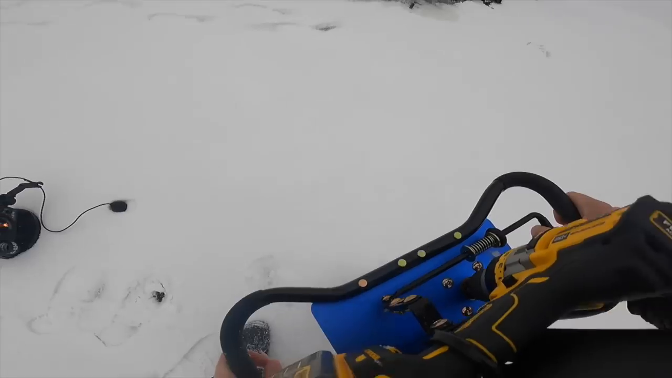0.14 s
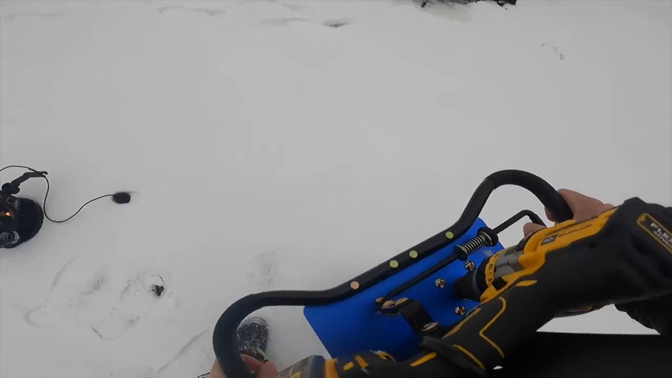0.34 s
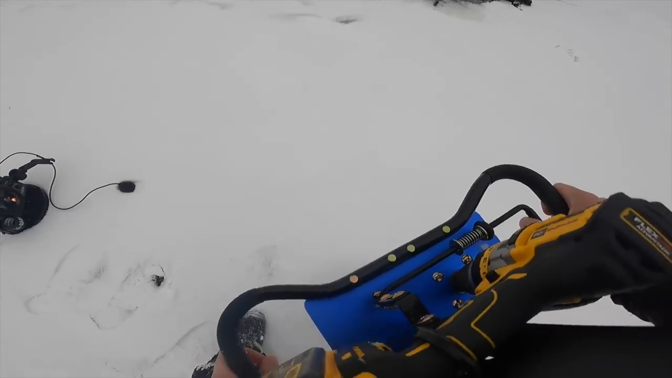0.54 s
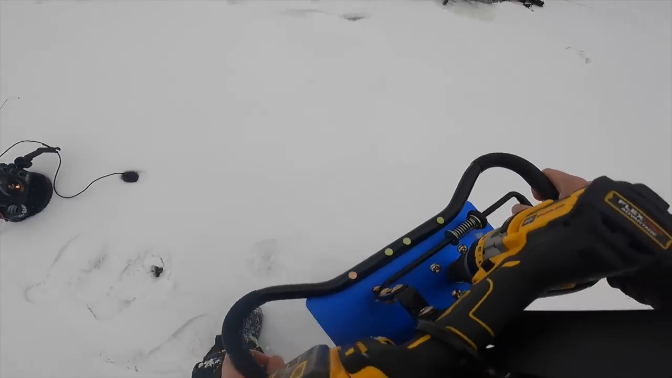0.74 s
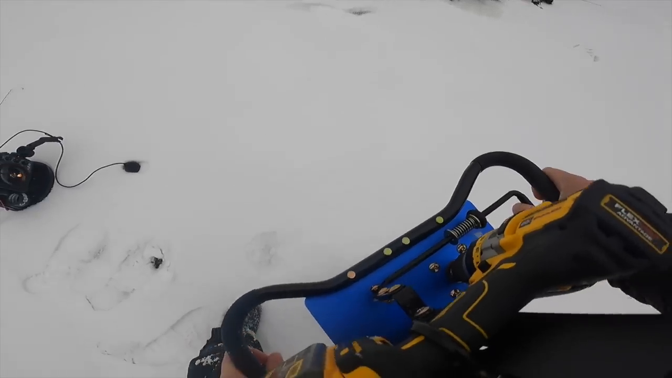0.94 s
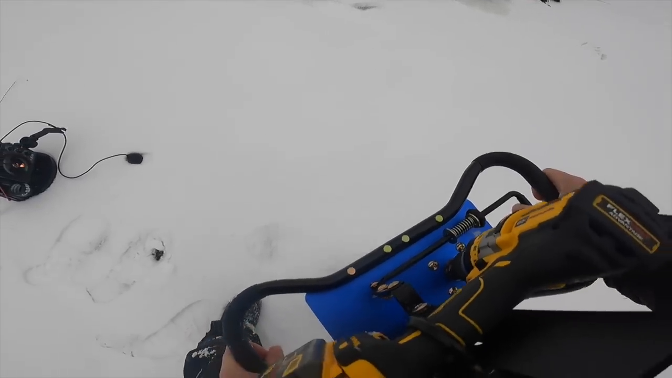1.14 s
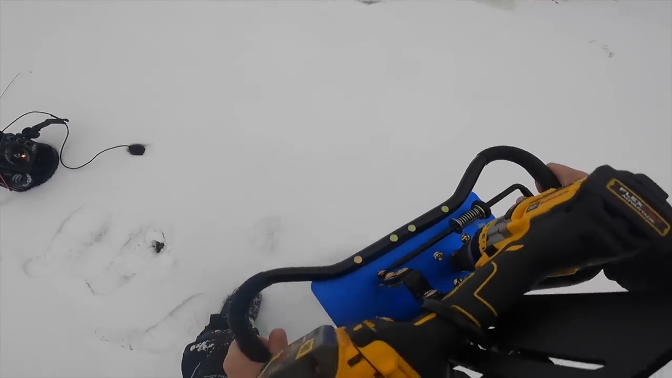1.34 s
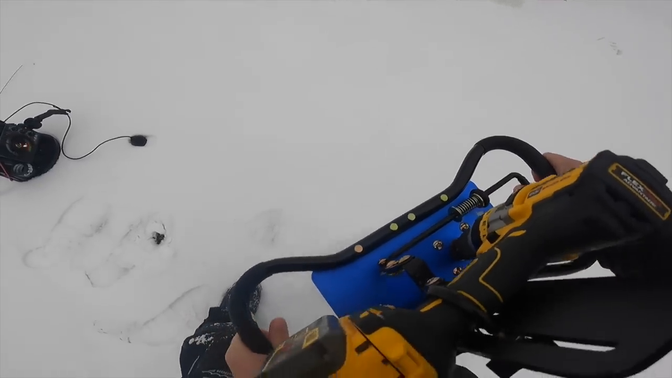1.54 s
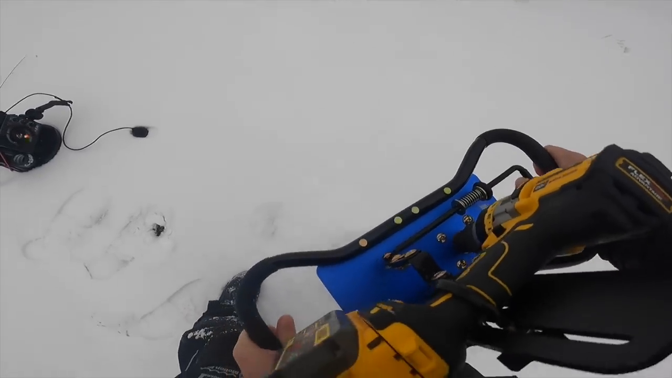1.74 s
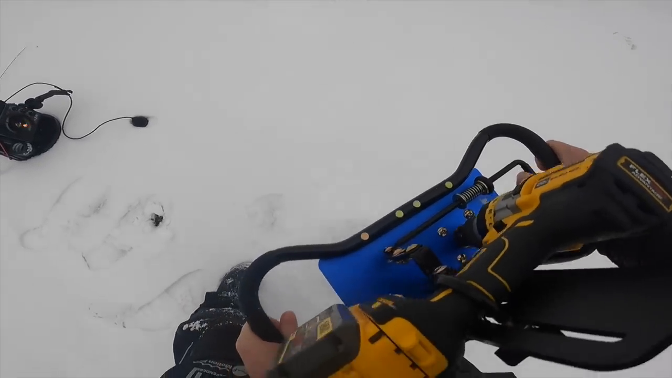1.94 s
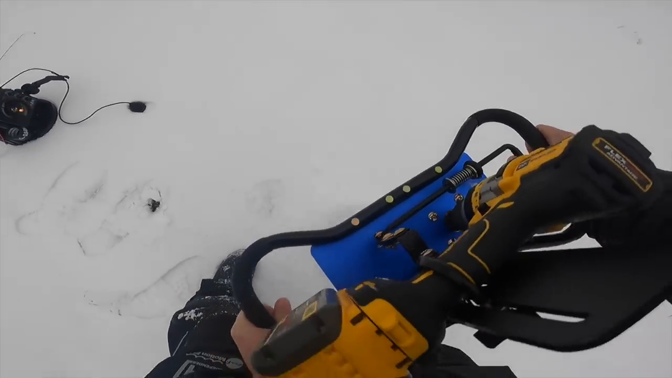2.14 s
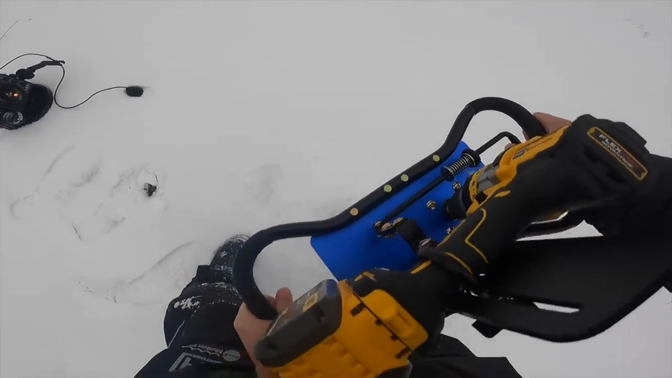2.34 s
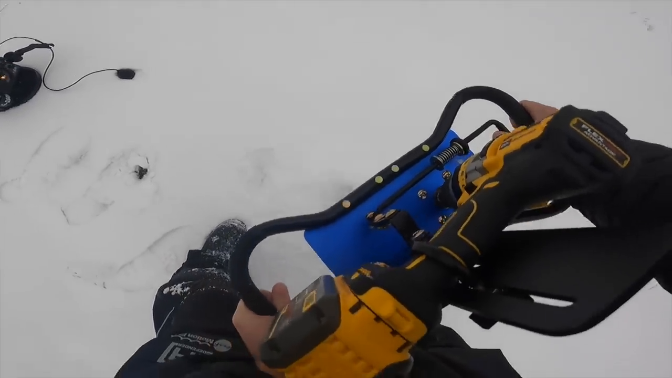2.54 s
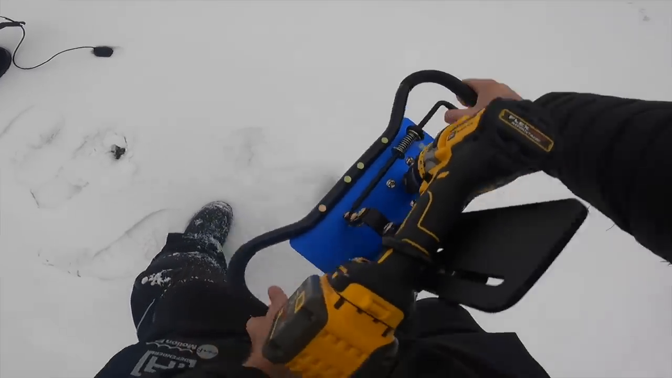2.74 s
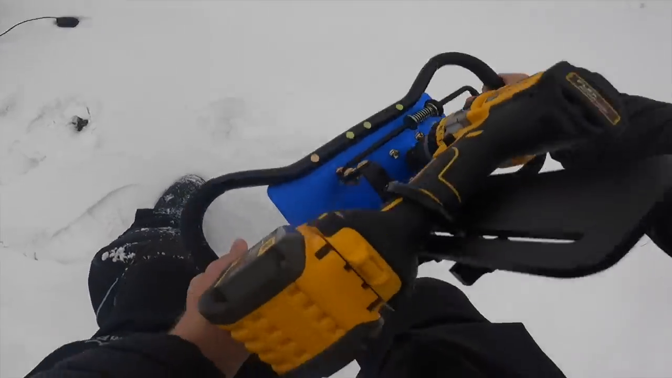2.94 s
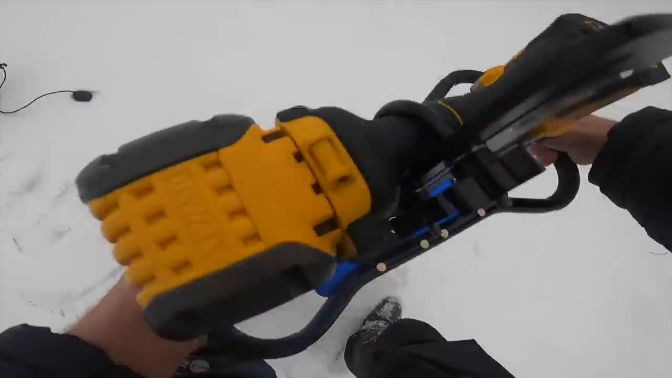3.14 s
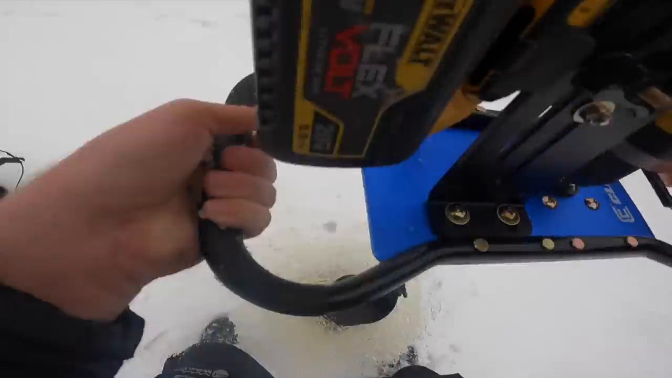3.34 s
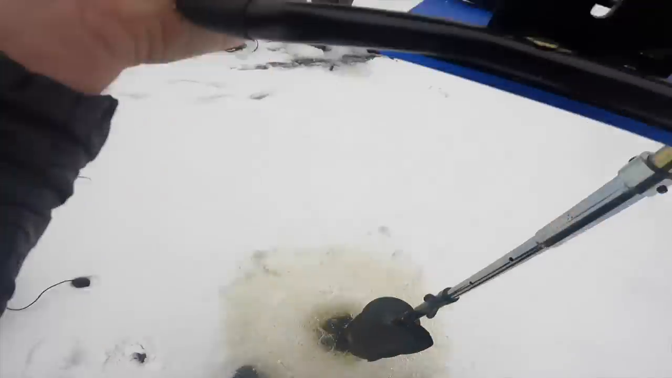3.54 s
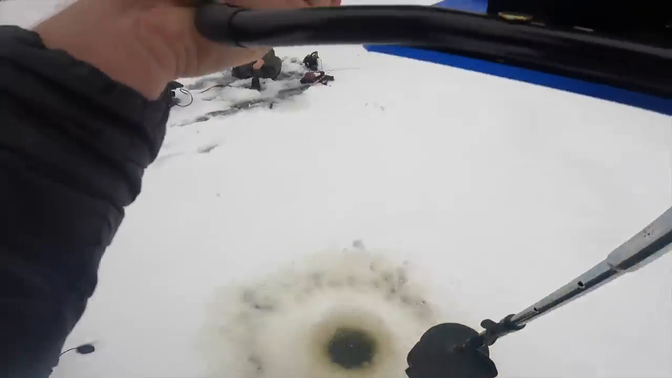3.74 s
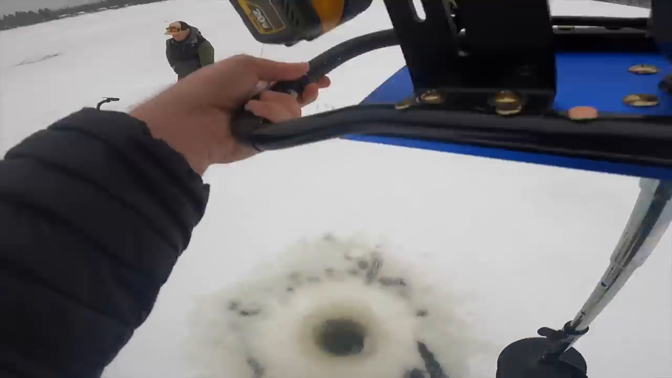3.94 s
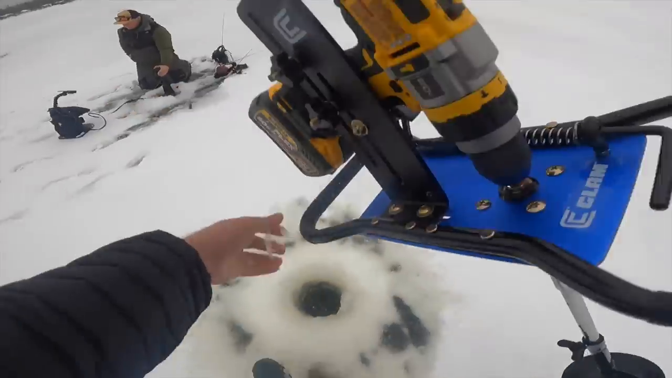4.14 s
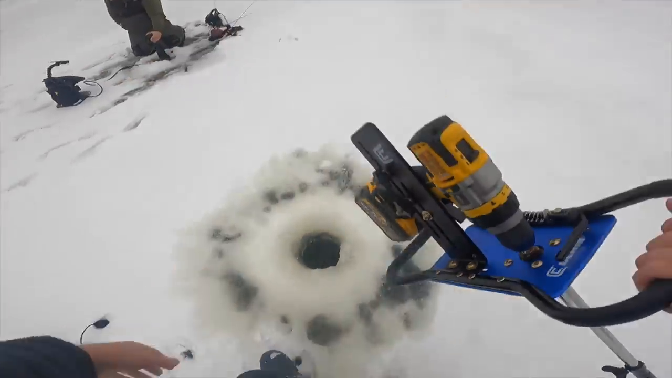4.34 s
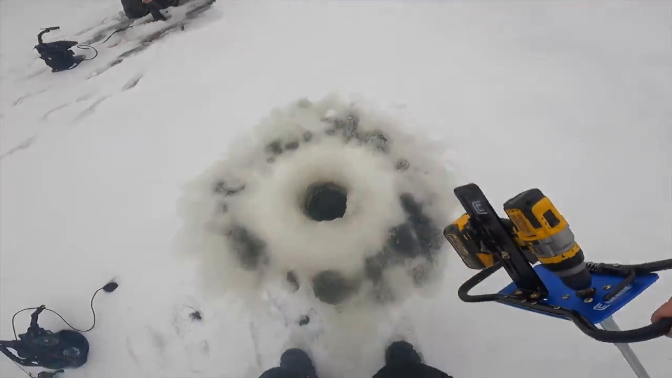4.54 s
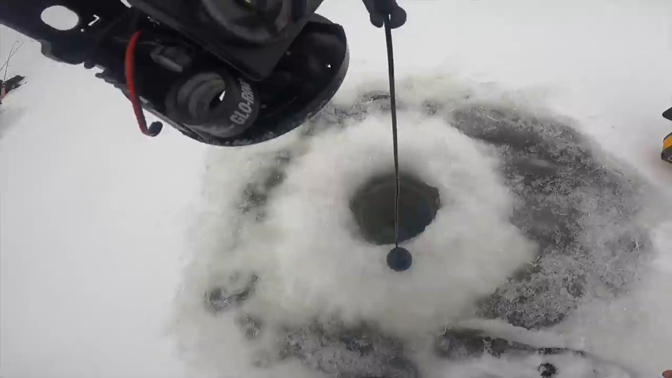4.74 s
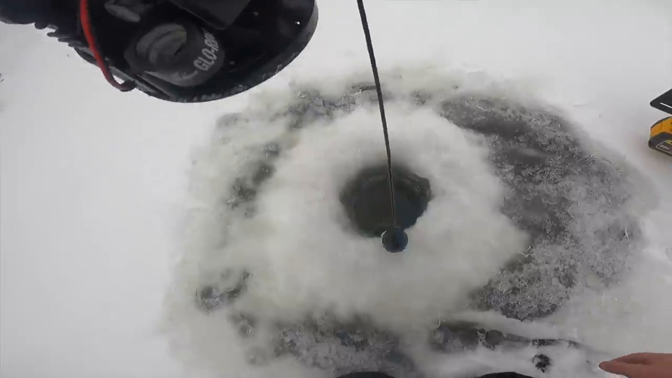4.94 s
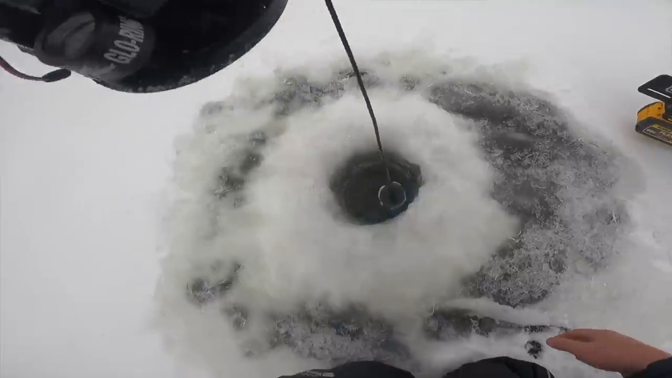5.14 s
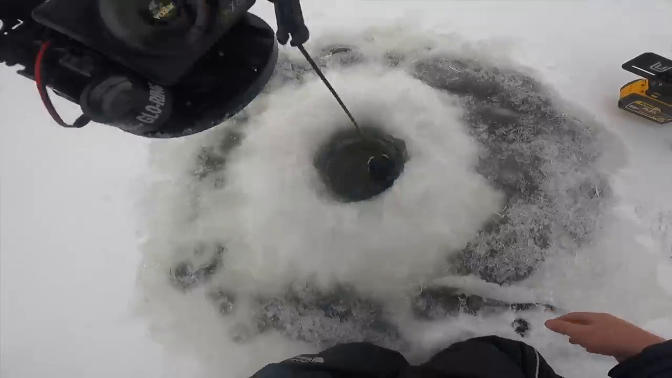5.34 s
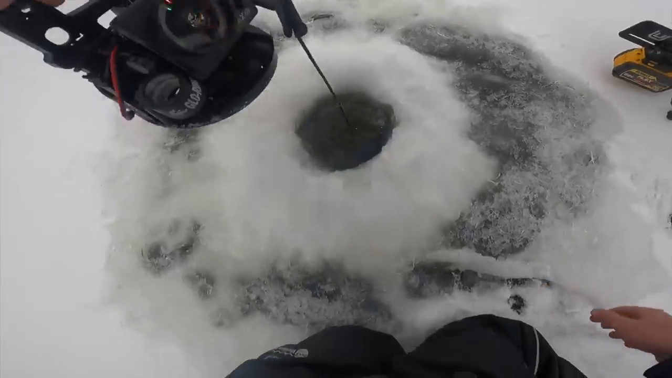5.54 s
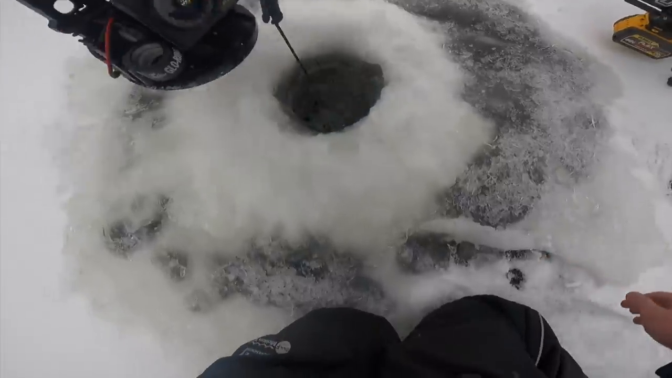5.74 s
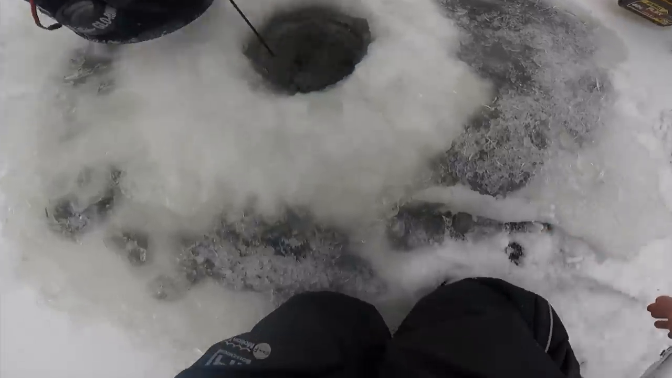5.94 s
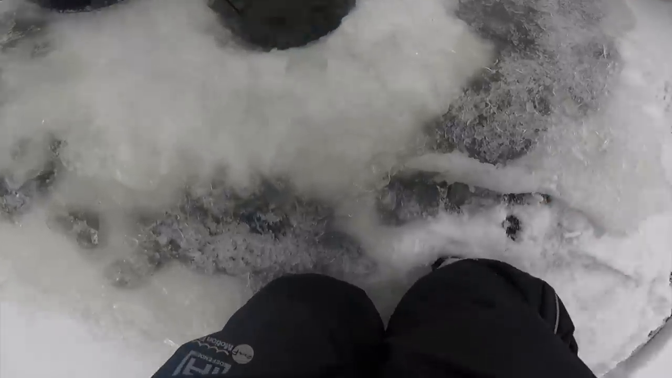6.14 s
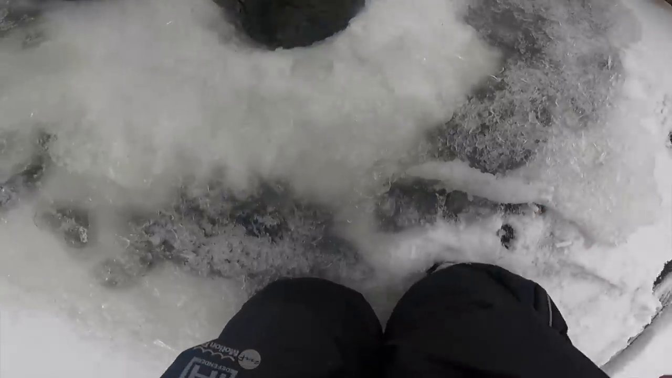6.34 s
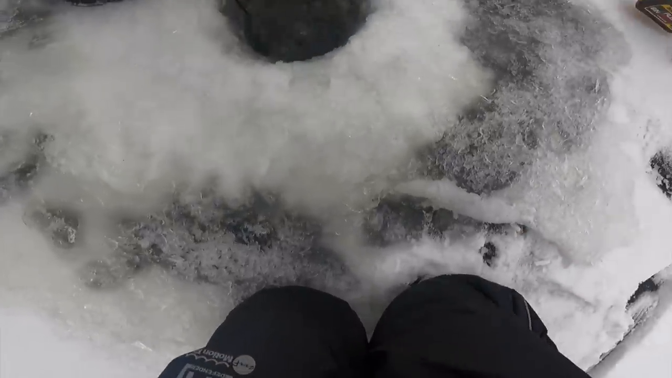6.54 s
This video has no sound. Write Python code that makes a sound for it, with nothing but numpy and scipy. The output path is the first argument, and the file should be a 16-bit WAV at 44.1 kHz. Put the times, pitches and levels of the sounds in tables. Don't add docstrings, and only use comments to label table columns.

```python
import sys
import numpy as np
from scipy import signal
from scipy.fft import rfft, irfft, next_fast_len
from scipy.io import wavfile
from scipy.ndimage import uniform_filter1d, map_coordinates

SR = 44100
rng = np.random.default_rng(int(sys.argv[2]) if len(sys.argv) > 2 else 0)


def boost(x):
    u = np.asarray(x, float) / 20
    return 10 ** u


def store_wav(level_fs):
    pcm = np.round(np.clip(np.atleast_2d(level_fs), -1, 1) * 32767)
    wavfile.write(sys.argv[1], SR, pcm.T.astype(np.int16))


N = 295029
LEFT_RIGHT = np.array([[.5], [-.5]])


def unit(x):
    return x / np.sqrt(np.mean(x ** 2) + 1e-20)


def along(points, hz):
    f, v = np.transpose(points)
    return np.interp(np.log(hz + 1), np.log(f + 1), v)


def curves(rows):
    s, *cols = np.transpose(rows)
    return [np.interp(np.arange(N) / SR, s, c) for c in cols]


def gate(start, end, fade):
    t = np.arange(N) / SR
    return np.clip((t - start) / fade, 0, 1) * np.clip((end - t) / fade, 0, 1)


def wobble(rate):
    knots = rng.standard_normal(int(N * rate / SR) + 4)
    return map_coordinates(knots, [np.arange(N) * rate / SR])


def filtered(x, response):
    m = next_fast_len(N + 8192)
    return irfft(rfft(x, m) * response(np.fft.rfftfreq(m, 1 / SR)), m)[..., :N]


def shape(spectrum):
    return lambda hz: boost(along(spectrum, hz))


def resonances(modes):
    def response(f):
        return sum((-1) ** k * boost(db) * 1j * f * width / (hz * hz - f * f + 1j * f * width)
                   for k, (hz, width, db) in enumerate(modes))
    return response


def grit(rate, spread_db):
    hit, sign, size = rng.random((3, N))
    return unit((hit < rate / SR) * np.sign(sign - .5) * boost(-spread_db * np.log(size + .06)))


def rush(colour, alike, patchy_db, chips=0):
    z = signal.stft(rng.standard_normal((2, N)), nperseg=512)[2]
    field = uniform_filter1d(rng.standard_normal(z.shape[1:]), size=6, axis=0)
    field = uniform_filter1d(field, size=10, axis=1)
    pair = unit(signal.istft(z * boost(patchy_db * unit(field)), nperseg=512)[1][:, :N]) + chips

    def mid_side(hz):
        turn = np.arccos(np.clip(along(alike, hz), -1, 1)) / 2
        return colour(hz) * [np.cos(turn), np.sin(turn)]
    mid, side = filtered(pair, mid_side)
    return unit(np.array([mid + side, mid - side]))


def whine(hz, drift):
    flutter = 1 + drift * wobble(110)
    return np.sqrt(2) * boost(3.5 * wobble(70) - 1) * np.sin(2 * np.pi * np.cumsum(hz * flutter) / SR)


def chirps(table):
    out, t = np.zeros(N + SR), np.arange(SR // 2) / SR
    for s, hz, rise, db, t60 in table:
        phase = 2 * np.pi * hz * (t + rise * t * t / t60)
        fade = boost(-15 * t / t60 - 220 * (t / t60) ** 2) * (1 - np.exp(-t * 90 / t60))
        out[round(s * SR):][:len(t)] += boost(db) * fade * np.sin(phase)
    return out[:N]


# time in seconds, share of extra speed.
EASES = [(.02, .035), (.13, .025), (.22, .015), (.285, .04), (.48, 0.039), (.57, .015), (.66, .045),
         (.73, .05), (.785, .03), (.85, .02), (.98, .05), (1.12, .05), (1.23, .025), (1.36, .05),
         (1.53, 0.052), (1.72, .02), (1.89, 0.046), (2.0, .015), (2.2, .035), (2.381, 0.026), (2.52, .065)]


def racing():
    t = np.arange(N) / SR
    climb_s, bite_s = .04, .022
    return sum(share * np.exp(-((t - s) / np.where(t < s, climb_s, bite_s)) ** 2) for s, share in EASES)


# time in seconds, mesh tone in Hz, effort in dB.
GEARS = [(0, 2395, 0), (.38, 2335, 0), (1.7, 2300, -1.5), (2.5, 2300, -1.5), (2.65, 2104, 4),
         (2.8, 2195, -1), (2.85, 2755, -2), (2.93, 3030, 0), (3.09, 3124, 0), (3.2, 3160, -2),
         (3.23, 3000, -21), (3.46, 1680, -8)]
# multiple of mesh, level in dB re mesh.
ORDERS_WEAK = [(1.22, -10), (3, -0.5), (4, -7), (5, -17)]


def gears(snag, ice):
    mesh_hz, effort_db = curves(GEARS)
    mesh_hz = mesh_hz * (1 + .007 * wobble(40) + racing())
    strain = 1 + 2 * snag + gate(THROUGH_S, 9, .1)
    drift = .011 * (1 + 2 * snag)
    mesh = whine(mesh_hz, drift)
    for multiple, db in ORDERS_WEAK:
        mesh = mesh + boost(db) / strain ** 2 * whine(multiple * mesh_hz, .015 * strain)
    mesh *= boost(-31.5 + 1.44 * effort_db - 4 * (1 - ice)) / (1 + 2 * snag)
    second = boost(-29.5 + effort_db) / strain ** .6 * whine(2 * mesh_hz, .012 * strain ** 1.2)
    carrier_db = -33 + 1.3 * effort_db - 5.5 * snag + 2.5 * (1 - ice)
    return mesh + second + boost(carrier_db) * whine(.615 * mesh_hz, drift)


SNAG_S, THROUGH_S = 2.45, 2.85
WET_DB = -17.5
# time in seconds, hiss in dB.
CUT = [(0, -20.5), (2.77, -21), (2.81, -21), (2.83, -27), (2.85, -20), (3.07, -20.5), (3.3, -26),
       (3.45, -29)]
# Hz, dB per Hz.
BLADES = [(710, -25), (1200, -4.5), (1460, -4.5), (2050, -12.5), (2380, -4.5), (2650, -9.5), (3350, -10.5),
          (4620, -2.5), (5310, -6), (7250, -2.5), (10600, -16), (12300, -20), (13000, -27), (14500, -30),
          (15500, -70)]
# Hz, width in Hz, dB.
SHAFT = [(609, 147, -3.5), (760, 207, -4), (1000, 142, 1), (1175, 119, -1.5), (1760, 240, -9.5),
         (3934, 150, -10.5), (6230, 240, -11)]
# Hz, dB per Hz.
ICE = [(15, -46), (25, -19), (70, 0), (113, 1.5), (230, -1.5), (425, -13), (500, -11.5), (650, -13.5),
       (1100, -120)]
# start in seconds, Hz, pitch rise, level in dB, t60 in seconds.
SLIPS = [(2.672, 3500, 0.6, -18, 0.12), (2.715, 4280, .05, -30, .07), (2.74, 4280, 0.2, -17, 0.087),
         (2.795, 4200, 0.3, -17, 0.082), (2.51, 5000, -.1, -24, .08), (2.57, 4450, .05, -25, .12),
         (2.85, 4400, -.05, -23, .07), (2.875, 4150, .1, -24, .08), (2.92, 4350, .05, -24, .06),
         (2.965, 3700, .05, -25, .05), (2.98, 4200, .05, -26, .06), (3.408, 3950, -0.1, -33, 0.09),
         (3.436, 3700, -0.25, -27, .07), (3.452, 4500, .1, -25, .04)]
# Hz, likeness.
ALIKE = [(60, 1), (700, .98), (1300, 1), (2400, 0.5), (3100, 0.99), (4400, 0.94), (7000, 0.99), (10500, 1),
         (11800, 0.18), (15000, 0.99)]
# Hz, L-R in dB.
LEAN = [(60, 0), (110, -1.5), (200, -1), (380, -2.5), (700, -4), (1290, -1.5), (2380, -5.5), (4400, -3.5),
        (8120, -1.0), (15000, 3.5)]
# Hz, L-R in radians.
LEAD = [(0, 0.09), (1810, 0.033), (2410, -0.93), (3100, -1.2), (3360, -0.84), (3880, 0.035),
        (10900, -0.014), (11700, 0.93), (12500, 0)]


def drill(surge):
    snag, ice = gate(SNAG_S, THROUGH_S + .103, .103), gate(-1, THROUGH_S, .036)
    wet = uniform_filter1d(np.clip(surge / boost(WET_DB), 0, 1), size=300)
    hiss_db = curves(CUT)[0]
    bite = wobble(14)

    hiss = rush(shape(BLADES), ALIKE, patchy_db=1.0, chips=.24 * grit(900, spread_db=6.5))
    hiss *= boost(hiss_db - .73 + .19 * bite + .87 * wobble(200))
    treble = filtered(hiss, lambda f: 1 / (1 + (9500 / (f + 1)) ** 8))
    hiss -= .6 * gate(3.2, 9, .04) * treble

    shaft_gain = ice * boost(-4 + snag) + wet * boost(-7.5) + (1 - ice) * boost(-22)
    shaft = rush(resonances(SHAFT), ALIKE, patchy_db=1.0, chips=.52 * grit(150, spread_db=4.5))
    shaft *= shaft_gain * boost(hiss_db + .6 * bite + 1.2 * wobble(60))

    rumble_gain = ice * boost(-9.5 + 6 * snag) + wet * boost(-7.5)
    rumble = rumble_gain * boost(hiss_db + .81 * wobble(18)) * rush(shape(ICE), ALIKE, patchy_db=.5)

    def ports(hz):
        level = boost(along(LEAN, hz) * LEFT_RIGHT) / (1 + (hz / 14650) ** 80)
        return level * np.exp(1j * along(LEAD, hz) * LEFT_RIGHT)
    tool = gears(snag, ice) * gate(-1, 3.44, .018) + chirps(SLIPS) * (.8 + .35 * wobble(500))
    return filtered(tool + (hiss + shaft) * gate(-1, 3.42, .072) + rumble, ports)


# Hz, likeness.
AROUND = [(60, 0.83), (150, 0.92), (380, 0.91), (950, 0.75), (2380, 0.48), (5980, 1), (15000, 0.82)]
# start in seconds, length in seconds, level in dB.
GUSTS = [(3.03, 0.3, -32.5), (3.47, .1, -37), (3.82, 0.37, -46.5), (4.498, 0.78, -40.5),
         (5.09, 0.12, -32.5), (5.79, 0.096, -41), (6.0, 0.26, -47), (6.42, .5, -41)]
# Hz, dB per Hz.
BUFFET = [(12, -20), (20, 4.5), (38, -2.5), (86, -6), (176, -23), (260, -24), (440, -120)]
# time in seconds, rustle in dB.
MOVING = [(3.2, -31), (3.49, -31.5), (3.7, -29), (3.86, -32.5), (3.96, -41), (4.33, -48), (4.55, -50),
          (5.03, -43), (5.21, -44), (5.22, -56.5), (5.476, -53), (5.6, -40.5), (5.78, -47), (5.85, -44),
          (6.3, -43), (6.52, -47), (6.69, -39.5)]
# Hz, dB per Hz.
RUSTLE = [(1060, -13), (1800, -3.5), (2580, -5), (4980, -6), (7540, -6), (9440, -10.5), (13700, -32),
          (15500, -44)]
# time in seconds, level in dB.
DRAINING = [(3.2, -33), (3.49, -32), (3.56, -40), (3.72, -52), (4.3, -53), (4.55, -48.5), (5.03, -39),
            (5.21, -40.5), (5.22, -57.5), (5.6, -41.5), (6.16, -41.5), (6.45, -46.5), (6.69, -41.5)]
# Hz, dB per Hz.
TRICKLE = [(71, -41), (120, -2), (292, 2), (478, -3), (583, -3), (1070, -1), (3500, -25), (7700, -120)]


def surroundings():
    t = np.arange(N) / SR
    gusts = boost(-57.5)
    for s, length, db in GUSTS:
        gusts = gusts + boost(db) * np.sin(np.pi * np.clip((t - s) / length, 0, 1))
    wind = gusts * boost(1.1 * wobble(22)) * rush(shape(BUFFET), AROUND, patchy_db=2.0)
    rustle = rush(shape(RUSTLE), AROUND, patchy_db=1.1, chips=.4 * grit(500, spread_db=4))
    rustle *= boost(curves(MOVING)[0] + .7 * wobble(30))
    trickle = rush(shape(TRICKLE), AROUND, patchy_db=1.8, chips=.4 * grit(200, spread_db=5))
    trickle *= boost(curves(DRAINING)[0] + .96 * wobble(25))
    return (rustle + trickle) * gate(3.2, 9, .2) + wind


# time in seconds, L-R in dB.
SIDE_DB = [(3.3, -4.5), (3.9, -1), (4.95, -4), (5.4, 8), (5.45, -2.5), (6.3, 4), (6.45, -4), (6.55, 8)]
# start in seconds, length in seconds, centre in Hz,
# level in dB.
SWISH = [(1.2, 2.1, 4200, -31.5), (2.845, 0.18, 4400, -27.5), (3.401, 0.16, 1000, -33.5),
         (3.568, 0.18, 1400, -26.5), (3.64, .2, 1150, -34), (4.3, 0.06, 1840, -44),
         (4.724, .12, 6230, -37.5), (4.864, 0.065, 3950, -33), (4.925, 0.036, 3020, -28.5),
         (4.997, 0.027, 3050, -38.5), (5.606, 0.074, 2900, -34.5), (6.132, 0.037, 6030, -26),
         (6.146, .13, 5350, -31.5)]


def strokes():
    out, t = np.zeros((2, N)), np.arange(N) / SR
    grain = rush(lambda f: 1 / (1 + (f / 11000) ** 10), AROUND, patchy_db=2.0,
                 chips=.5 * grit(650, spread_db=2.5))
    grain *= boost(1.2 * wobble(80))
    for s, length, hz, db in SWISH:
        swell = np.sin(np.pi * np.clip((t - s) / length, 0, 1)) * boost(db)
        band = resonances([(hz, hz, 0)])
        out += swell * unit(filtered(grain, lambda f: band(f) ** 2))
    return out * boost(curves(SIDE_DB)[0] * LEFT_RIGHT)


# start in seconds, Hz, pitch rise, level in dB, t60 in seconds.
BUBBLES = [(5.603, 141, 1.1, -7, .16), (5.6015, 287, -0.1, -11.5, 0.037), (5.587, 190, 1, -26, .04),
           (5.617, 480, 1, -16, .03), (5.65, 200, 0, -27, .18), (5.079, 310, 0.5, -29, .04),
           (5.629, 330, 4.5, -20, 0.0906), (5.650, 550, 0.94, -18.5, 0.037), (5.657, 930, 0.9, -21, 0.068),
           (5.66, 130, 1.5, -31, 0.275), (5.815, 310, 0, -23, 0.033), (4.872, 130, 1.4, -29.5, 0.225),
           (4.885, 315, -0.5, -30, 0.081), (2.4, 160, -1, -15, 0.087), (2.655, 174, -1, -13.5, 0.093)]


def plop():
    rings = -chirps(BUBBLES) * boost(1.6 * wobble(180))
    return filtered(rings, lambda f: 1 / (1 + (82 / (f + 1)) ** 4)) * boost(LEFT_RIGHT)


# start in seconds, length in seconds, air column at the end in Hz, level in dB, slosh in dB.
GURGLE = [(2.86, 0.02, 230, -20, -3), (2.886, .056, 140, -14, -19), (2.968, 0.019, 250.5, -26, -2),
          (3.024, .02, 192.4, -16, -8), (3.058, 0.012, 220, -22, -22), (3.075, .01, 200, -29, -10),
          (3.101, 0.045, 264.8, -10.5, -8.5), (3.155, 0.0436, 199.7, -15.5, -7),
          (3.205, 0.015, 230, -20, -4), (3.224, .02, 270, -16.5, -1.5), (3.247, 0.025, 309.8, -14, -6),
          (3.281, .03, 322, -14.5, -2), (3.318, .016, 300, -21.5, -2), (3.342, .018, 336.3, -14, -7.5),
          (3.368, 0.012, 339, -23.5, -6), (3.471, 0.047, 292, -35, -14)]


def surges():
    open_hz = 258.5
    level, slosh, column_hz = np.zeros(N), np.zeros(N), np.full(N, open_hz)
    t = np.arange(N) / SR
    for s, length, end_hz, db, slosh_db in GURGLE:
        fall = boost(-800 * np.clip(t - s - length, 0, 1))
        surge = boost(db) * np.clip((t - s) / .0048, 0, 1) * fall
        level += surge
        slosh += boost(slosh_db) * surge
        start_hz = max(open_hz, column_hz[-1])
        column_hz[t > s] = np.interp(t[t > s], [s, s + length], [start_hz, end_hz])
    return level, slosh, column_hz


def gurgle(level, slosh, column_hz):
    phase = 2 * np.pi * np.cumsum(column_hz * (1 + .06 * wobble(70))) / SR
    column = np.sqrt(2) * np.sin(phase) * boost(1.5 * wobble(60))
    churn = rush(resonances([(140, 88, -2), (230, 140, -.5)]), ALIKE, patchy_db=2.5)
    hole = resonances([(400, 200, 0), (570, 180, -1), (780, 200, -6)])
    splash = rush(lambda f: hole(f) / (1 + (f / 900) ** 4), ALIKE, patchy_db=3)
    splash *= boost(1.8 * wobble(50))
    return (boost(-4.5) * level * (column + .62 * churn) + slosh * splash) * boost([[-.8], [.8]])


# time in
# seconds, peak in dB, ring in Hz, thud in dB.
KNOCKS = [(3.026, -20, 1100, 2), (3.3444, -16, 6000, -8), (3.4194, -21, 3650, -15),
          (3.5907, -13, 2200, -22), (4.7282, -25, 1530, -4), (4.8954, -12, 6900, -16),
          (4.9474, -14.5, 2800, -13), (5.009, -29, 1710, -2), (5.4256, -17, 3270, -12.5),
          (5.5712, -21, 7960, -26), (5.5842, -15.5, 2640, -25), (5.6181, -13.5, 4130, -8.5),
          (5.6456, -11.5, 2360, -11), (5.6524, -17, 2620, -8), (5.7723, -23, 3600, -25),
          (5.8227, -19.5, 6040, -16), (5.9734, -29.5, 1520, 3), (6.115, -21.5, 6900, -19)]
# time in seconds, peak in dB, ring in Hz, thud in dB.
TICKS = [(3.4665, -11, 7300, -21), (3.493, -5, 7750, -17), (3.5435, -14, 6120, -25),
         (3.5573, -7, 5240, -17), (3.9, -18, 2136, -25), (4.0906, -22, 4400, -28),
         (4.781, -28.5, 1100, -1.5), (5.1322, -21, 2530, -7), (5.2116, -21, 4500, -12),
         (5.526, -25, 3300, -25), (5.5445, -25, 3500, -25), (5.556, -31, 1250, -7), (5.693, -29, 1700, -10),
         (5.7326, -26, 3500, -9), (5.6012, -6, 4270, -10.5), (5.7693, -7, 9000, -32),
         (6.0531, -20.5, 7150, -12), (6.0955, -18, 2930, -22), (6.175, -15, 7850, -25),
         (6.186, -20, 7000, -25), (6.1963, -10.5, 4490, -23), (6.2168, -12, 5600, -27),
         (6.4502, -19, 3540, -20), (6.525, -30, 2000, -8), (4.287, -29, 5000, -25), (4.433, -29, 4500, -3),
         (6.5545, -26, 5030, -16)]
# time in seconds, peak in dB, ring in Hz, thud in dB.
CLANKS = [(3.8531, -17, 6880, -37), (4.3794, -8.5, 7050, -18), (4.4119, -27, 4900, -12.5),
          (4.8668, -12, 5940, -5.5), (4.8774, -9.5, 4810, -15.5), (4.8874, -14.5, 7070, -4.5),
          (4.9362, -12.5, 1710, -16), (5.4535, -18.5, 7900, -22), (5.4645, -12.5, 9130, -34),
          (5.8134, -24.5, 6690, -6.5), (6.1473, -13, 4800, -13), (6.1544, -11.5, 4140, -15.5),
          (6.2494, -25.5, 3990, -7)]
# time in seconds, level in dB.
FRAME = [
    (4.895, -28),
    (4.936, -20.5),
    (4.965, -37),
    (5.004, -24.5),
]
# Hz, dB per Hz.
SNAP = [(710, -52), (1200, -1), (1360, -7), (1860, 2.5), (2330, 1), (4380, -0.5), (7090, -1.5),
        (11900, -13.5), (15500, -40)]


def knocks():
    cracks, rings, thuds = out = np.zeros((3, 2, N + SR))
    t = np.arange(SR // 8) / SR
    for rows, t60 in ((CLANKS, .052), (KNOCKS, .029), (TICKS, .017)):
        rattle = boost(-60 * t / t60)
        blow = rattle + 1.36 * boost(-60 * t / .0068)
        for s, db, hz, thud_db in rows:
            noise = rng.standard_normal((3, len(t))) * blow * (1 - np.exp(-t / .00061))
            noise[:, :6] = 1.5 * np.hanning(6) * np.sign(noise[0, 3])
            both, ports = noise[0], noise[1:]
            near = signal.lfilter(*signal.iirpeak(hz, 2.2, SR), both + .29 * ports)
            span = slice(round(s * SR), round(s * SR) + len(t))
            cracks[:, span] += boost(db - 6) * (.43 * both + .31 * ports + 1.25 * near)
            rings[:, span] += boost(db - 11) * np.sin(2 * np.pi * hz * t) * rattle
            thuds[:, span] += boost(db + thud_db + 11) * both
    for s, db in FRAME:
        swell = np.exp(1 - (t / .015) ** 2) * t / .023
        glide = np.sin(2 * np.pi * (950 * t + 1800 * t * t))
        rings[:, round(s * SR):][:, :len(t)] += boost(db) * swell * glide
    cracks, rings, thuds = out[..., :N]
    dull = signal.butter(2, [200, 1500], "bandpass", fs=SR, output="sos")
    sides = boost(curves(SIDE_DB)[0] * LEFT_RIGHT)
    return sides * (filtered(cracks, shape(SNAP)) + rings + signal.sosfilt(dull, thuds))


# time in seconds, peak in dB.
PINGS = [(5.21, -37), (5.41, -39), (5.47, -26), (5.56, -23), (5.6, -38), (6.0, -52)]
# time in seconds, level in dB.
HUM = [(5.22, -47), (5.5, -56), (6.3, -49), (6.45, -60), (6.6, -48.5)]


def sonar():
    edges, t = np.zeros(N), np.arange(260) / SR
    at = np.round(np.arange(5.2192, 6.68, .02089) * SR).astype(int)
    edges[at] = boost(curves(PINGS)[0][at] + rng.normal(0, 1.3, len(at)))
    burst = boost(-60 * t / .0075) + 1.34 * (t > .0012) * boost(-60 * (t - .0012) / .0065)
    modes = resonances([(4600, 2500, -3), (8600, 2500, 0)])
    clicks = np.convolve(edges, burst)[:N] * rng.standard_normal(N)
    clicks = filtered(clicks, lambda f: modes(f) / (1 + (f / 11000) ** 8))
    hum = boost(curves(HUM)[0]) * whine(np.full(N, 156.0), drift=.064)
    return 1.38 * clicks + hum * gate(5.25, 9, .02)


def scene():
    water = surges()
    return drill(water[0]) + surroundings() + strokes() + plop() + gurgle(*water) + knocks() + sonar()


def roll_off(x):
    return signal.sosfilt(signal.butter(12, 15690, fs=SR, output="sos"), x)


def record(dry):
    soft = dry / (1 + np.abs(dry / .8) ** 5) ** (1 / 5)
    mix = filtered(soft, lambda hz: hz < 15800)
    return roll_off(mix)


dry = scene()
out = record(dry)
store_wav(out)
```